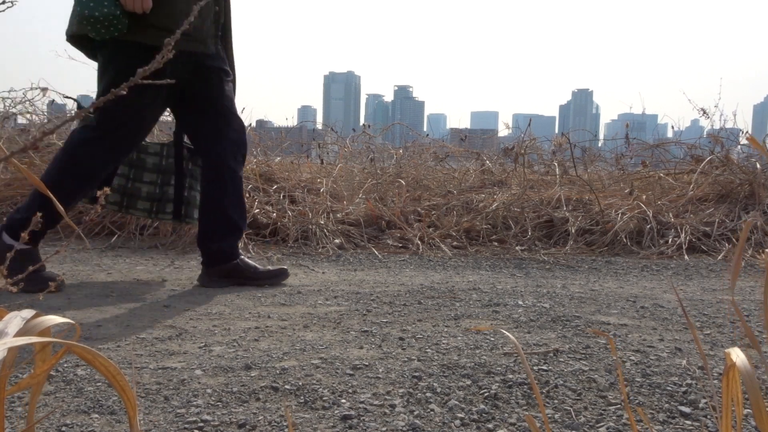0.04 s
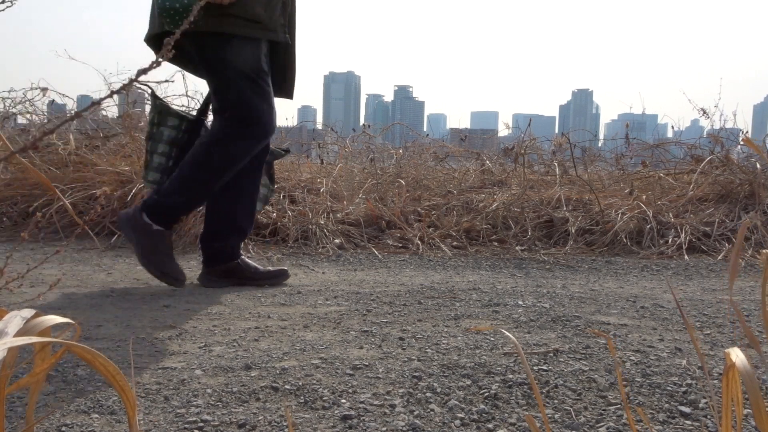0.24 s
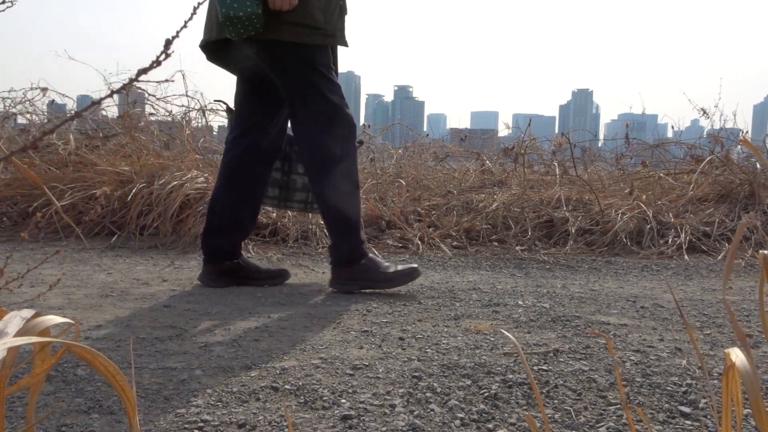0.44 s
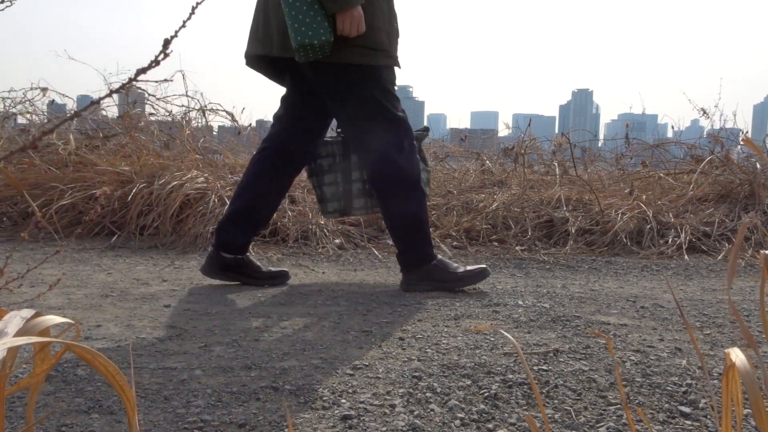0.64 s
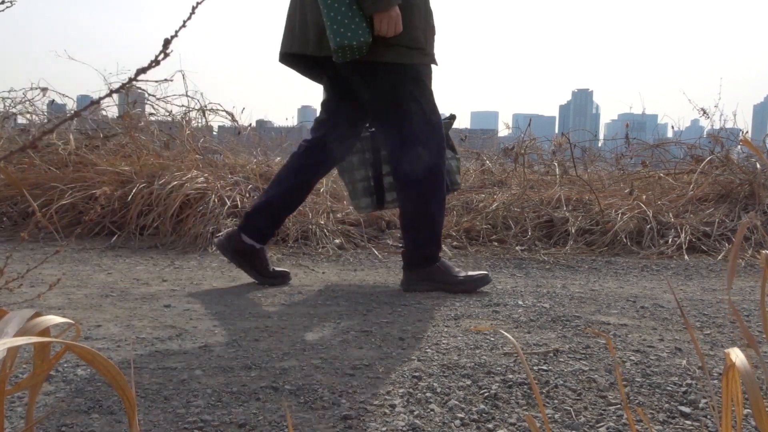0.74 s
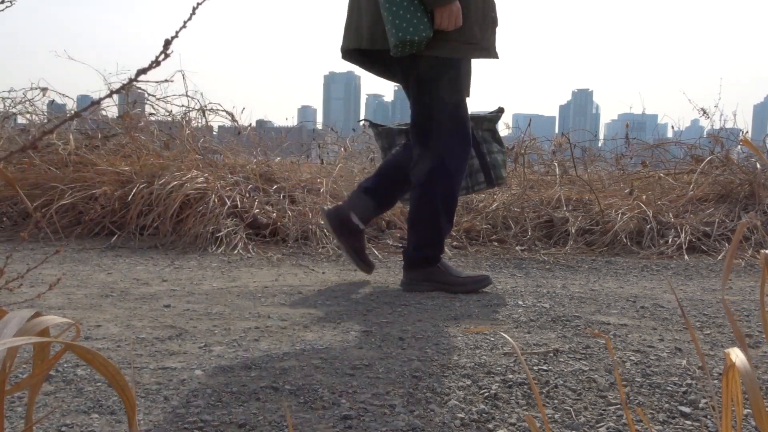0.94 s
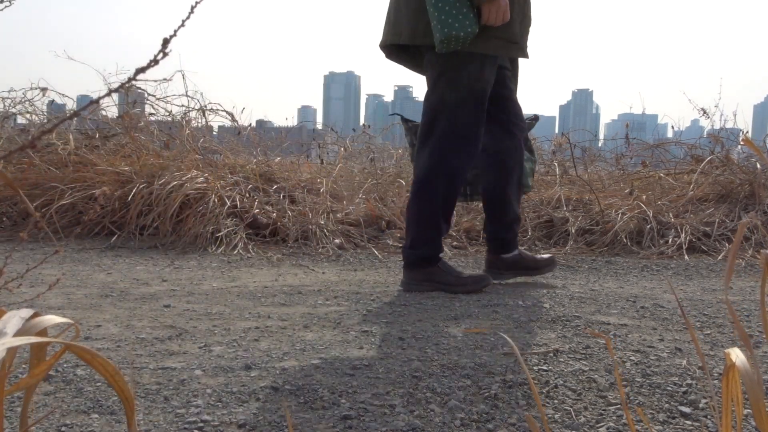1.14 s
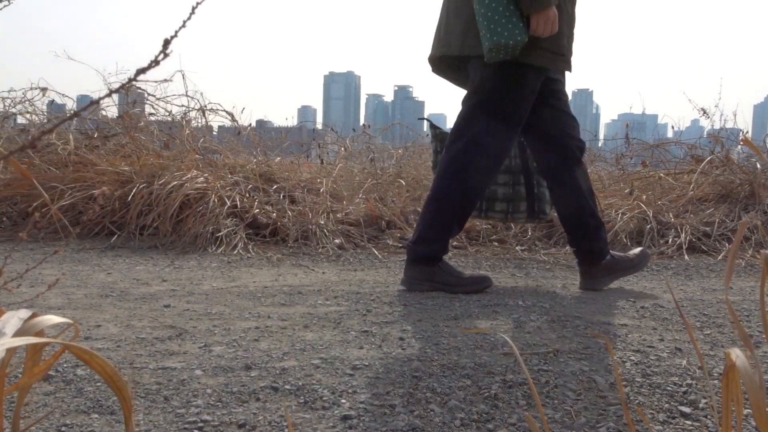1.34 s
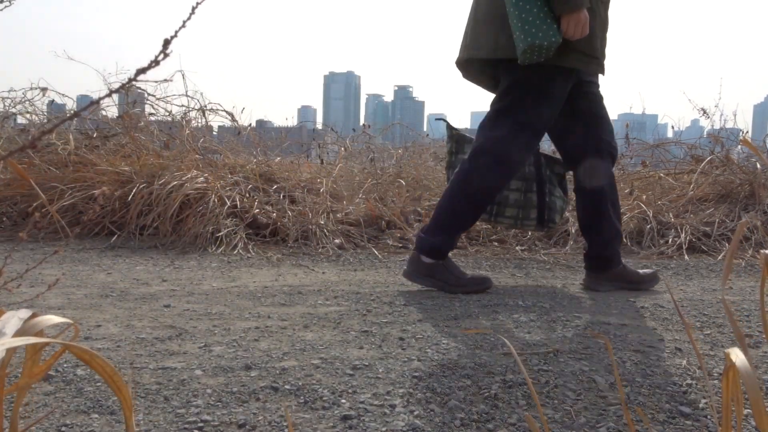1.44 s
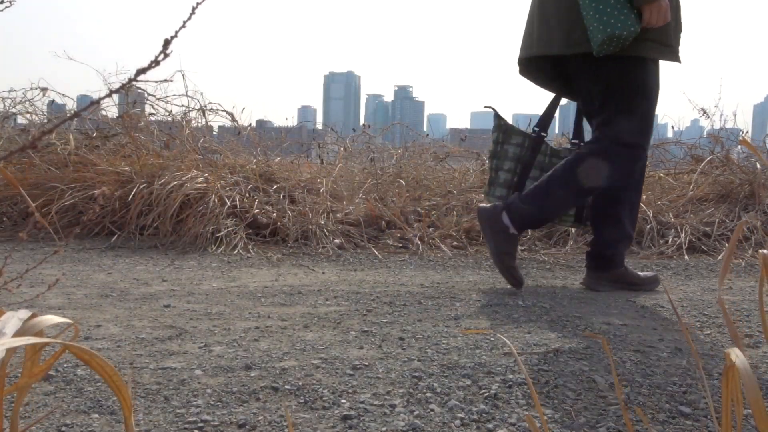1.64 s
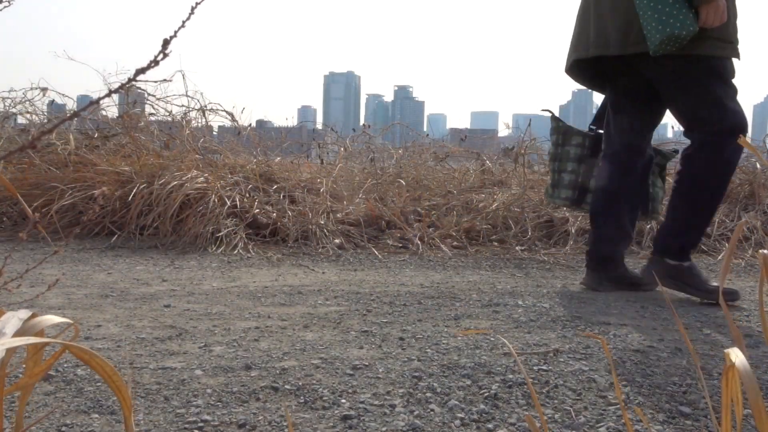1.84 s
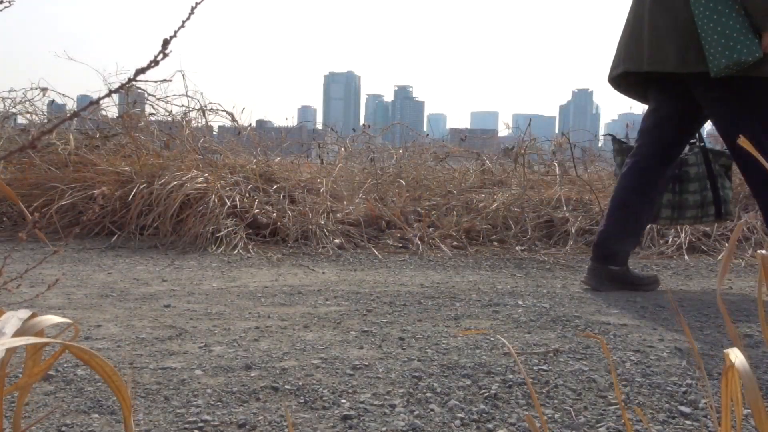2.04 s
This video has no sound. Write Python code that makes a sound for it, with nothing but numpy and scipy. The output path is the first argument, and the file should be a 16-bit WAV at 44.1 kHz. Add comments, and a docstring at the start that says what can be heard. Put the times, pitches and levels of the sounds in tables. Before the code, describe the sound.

Footsteps crunch on gravel, passing close by over a faint wash of distant traffic.

```python
"""Crunching footsteps pass close by on a gravel path, left to right, over the wash of a distant city.
Hard-soled shoes land on the heel, roll down and push off, pressing small grit into thousands of tiny
clicks that blend into a crunch. Single stones snap under the sole, and the swinging foot flicks pebbles
away. The path and the dry grass throw a little sound back. Far behind are steady traffic, a low hum
and a few faint, brief tones."""
import sys
import numpy as np
from scipy import signal
from scipy.fft import rfft, irfft
from scipy.io import wavfile
from scipy.ndimage import uniform_filter1d, map_coordinates

SR = 44100
rng = np.random.default_rng(int(sys.argv[2]) if len(sys.argv) > 2 else 0)


def master_out(mix):
    """Clip the mix to full scale and print it as 16-bit PCM to the path in sys.argv[1]."""
    frames = np.transpose(np.atleast_2d(mix))
    ceiling = np.clip(frames, -1, 1)
    pcm = np.round(ceiling * 32767).astype(np.int16)
    wavfile.write(sys.argv[1], SR, pcm)


N = 92213

# The tone of the distant traffic, from bass to treble: pitch_hz, relative_level_db
CITY_COLOUR = [(15, -57), (25, -50), (54, -23.5), (128, -9.5), (254, -10), (391, -5.5), (433, -5),
               (480, -4.5), (651, -5.5), (703, -4.5), (862, -10.5), (930, -9.5), (1550, -7), (3160, -15.5),
               (3410, -19), (5260, -21), (11000, -32), (14300, -85), (22000, -120)]
# How alike the traffic is on the left and right: pitch_hz, likeness_0_to_1
CITY_SIDES_ALIKE = [(60, 0.99), (140, 1), (340, 0.98), (810, 0.85), (1920, 0.48), (4570, 0.074),
                    (10900, 0.01)]
# Which side the traffic leans to: pitch_hz, left_minus_right_db
CITY_LEAN = [(100, -0.5), (500, 0), (2000, -3.5), (9000, 0)]
# Faint far-off tones: middle_s, half_length_s, pitch_hz, level_db
FAR_TONES = [(0.21, 0.081, 1560, -60), (0.22, 0.048, 1900, -56), (0.29, 0.037, 2160, -58.5),
             (0.274, 0.016, 975, -54.5), (.466, 0.018, 1340, -57.5)]
# The part of the thrown-back sound that differs between left and right: pitch_hz, gain_db
SCATTER_WIDTH = [(300, -40), (2000, -15), (5000, -5.5), (10000, 3)]
# Where the walker is heard: time_s, left_minus_right_db, left_delay_s
WALKER_PATH = [(0, 1, -.00003), (.7, -1, 0), (1.41, -4, .000015), (1.58, -2, .00001), (2.09, -7, .00004)]
# Loose pebbles flicked by the swinging foot: start_s, level_db
PEBBLE_FLICKS = [(0.496, -49.5), (0.5262, -50), (0.5589, -33), (1.8093, -41.5), (1.9777, -48)]
# The pitches a pebble rings with: pitch_hz, relative_level_db, fade_cycles
PEBBLE_RINGS = [(2600, -1, 0.27), (4870, -5, 1.04), (6020, -8, 0.52), (8300, -13.5, .22)]
# Hard contacts under the shoe: single stones snapping under the sole, plus the heel striking at 1.41 s (the
# loudest row): start_s, level_db, ring_pitch_hz, crack_against_ring_db
STONE_SNAPS = [ (0.0035, -26.5, 2010, -6.5), (0.0217, -35, 2140, -16), (0.0537, -34.5, 2200, -4),
               (0.159, -33, 2240, -14), (0.1659, -45, 2500, 5), (0.5766, -41.5, 2200, -18),
               (0.6563, -35, 2830, -1), (0.6739, -27, 2350, -4), (0.6759, -26.5, 1550, -10),
               (0.6860, -31, 1690, -20), (0.6890, -26.5, 2900, -7), (0.6915, -42, 2170, -14),
               (0.6964, -21.5, 2780, -15), (0.6966, -20.5, 1480, -12), (0.7003, -32, 1760, -14),
               (0.7265, -38.5, 2800, -19), (0.7396, -37, 2940, -1), (0.762, -34, 2800, -7),
               (0.7919, -37, 1450, -17), (0.8494, -39, 2480, -8), (0.8777, -28.5, 2350, -9),
               (1.3992, -33, 2480, -12), (1.41, -36, 2600, -4), (1.4143, -8.5, 1980, -19.5),
               (1.419, -38, 1930, -18), (1.4499, -27.5, 2500, -6), (1.4677, -32.5, 1500, -1.5),
               (1.4880, -32.5, 2500, -4), (1.5116, -36, 1160, -15), (1.5301, -21.5, 2210, -23),
               (1.5512, -27, 2270, -14), (1.5628, -24.5, 2500, -8), (1.5712, -28, 2280, -16),
               (1.5748, -22.5, 2180, -27), (1.5762, -29, 2250, -5), (1.5826, -28, 1280, -7),
               (1.5853, -31, 1890, -14), (1.6637, -30, 2250, -15), (1.6942, -40, 2000, -1), ]
# The tone shaping applied to all those snaps: pitch_hz, gain_db
STONE_TONE = [(150, -1), (420, 4), (950, -1), (2100, 0), (3100, -2), (4200, 0), (5600, -3), (7500, -3),
              (11000, -7)]
# Each press of a shoe on the grit (heel, sole, toe, push-off) over four steps:
# peak_s, rise_s, fall_s, level_db, grain_pitch_hz
SHOE_PRESSES = [ (0.004, 0.013, 0.14, -47.5, 2010), (0.159, 0.1, 0.084, -51, 1990),
                (0.661, 0.017, 0.014, -44.5, 1940), (0.693, 0.012, 0.014, -41.5, 1790),
                (0.762, 0.11, 0.097, -49.5, 1980), (1.302, 0.0044, 0.014, -53, 1780),
                (1.403, 0.021, 0.086, -46.5, 2200), (1.518, 0.072, 0.032, -46.5, 1730),
                (1.564, 0.016, 0.0066, -34.5, 2215), (1.576, 0.01, 0.0057, -33.5, 1990),
                (1.638, 0.086, 0.12, -49.5, 1926), (2.082, 0.006, .05, -46, 1580), ]
# The tone shaping applied to the whole crunch: pitch_hz, gain_db
GRIT_TONE = [(100, -16), (350, -1), (600, 2), (950, 1.5), (1250, -1), (2000, 0), (2700, 0), (3500, -3.5),
             (4400, -1), (5600, 1.5), (7000, -6.5), (11000, 17)]


def amp(db):
    """Turns decibels into a number to multiply by."""
    return 10 ** (np.asarray(db) / 20)


def unit(x):
    """Scales a signal to an average strength (rms) of 1."""
    return x / np.sqrt(np.mean(x ** 2) + 1e-20)


def look_up(table, hz):
    """Reads a table between its rows, on a musical (logarithmic) pitch scale."""
    pitches, values = np.transpose(table)
    return np.interp(np.log(hz + 1), np.log(pitches + 1), values)


def colour(x, table):
    """Makes each pitch louder or softer by a table of pitch_hz, gain_db."""
    size = 2 * N
    gain = amp(look_up(table, np.fft.rfftfreq(size, 1 / SR)))
    return irfft(rfft(x, size) * gain, size)[..., :N]


def add(mix, start_s, sound):
    """Mixes a sound in at the given time."""
    part = mix[max(round(start_s * SR), 0):][:len(sound)]
    part += sound[:len(part)]


def drift(samples):
    """A slow random wobble: noise averaged over this many samples."""
    return unit(uniform_filter1d(rng.standard_normal(N), size=samples))


def wavering_tone(hz, wander_hz):
    """A tone whose pitch wanders at random."""
    pitch_hz = hz + wander_hz * drift(500)
    return np.sqrt(2) * np.sin(2 * np.pi * np.cumsum(pitch_hz) / SR)


def ping(hz, fade_cycles):
    """One hard contact: a tiny ring that swells and dies, lasting longer with more fade_cycles."""
    cycles = hz * np.arange(500) / SR
    age = cycles / fade_cycles
    wave = np.gradient(age ** 4 * np.exp(-age) * np.sin(2 * np.pi * cycles))
    return wave / abs(wave).max()


def city_traffic(level_db=-55, patchy_db=1.56):
    """Distant traffic blends into a smooth wash of noise with slight drifting patches."""
    frames, hz = N // 256 + 5, np.fft.rfftfreq(1024, 1 / SR)
    a, b, c, d, patches = rng.standard_normal((frames, len(hz), 5)).T
    patches = uniform_filter1d(patches, size=10, axis=0)  # smooth across pitch
    patches = unit(uniform_filter1d(patches, size=16, axis=1))  # and across time
    alike = look_up(CITY_SIDES_ALIKE, hz)[:, None]
    left = a + 1j * b
    right = alike * left + np.sqrt(1 - alike ** 2) * (c + 1j * d)
    spectrum = np.array([left, right]) * amp(look_up(CITY_COLOUR, hz)[:, None] + patchy_db * patches)
    spectrum *= amp(np.array([[1], [-1]]) * look_up(CITY_LEAN, hz) / 2)[:, :, None]
    wash = signal.istft(spectrum, nperseg=1024, noverlap=768)[1][:, :N]
    return amp(level_db) * unit(wash)


def far_hum(level_db=-70, swell=0.4):
    """A low, far-off hum that comes and goes."""
    return amp(level_db) * wavering_tone(hz=383.8, wander_hz=13.22) * (1 + swell * drift(6000))


def far_tones(flutter=0.42):
    """A few faint tones from far away swell, flutter and fade."""
    t = np.arange(N) / SR
    out = np.zeros(N)
    for middle_s, half_s, hz, db in FAR_TONES:
        swell = np.exp(-.5 * ((t - middle_s) / half_s) ** 2) * (1 + flutter * drift(600))
        out += amp(db) * swell * wavering_tone(hz, wander_hz=43.5)
    return out


def ground_scatter(x, level_db=-15, die_away_s=0.05, delay_s=.0012, spread_s=.007):
    """The path and dry grass add a faint, short echo to a sound; gives left and right."""
    t = np.arange(6000) / SR
    tails = rng.standard_normal((2, len(t))) * amp(-60 * t / die_away_s) * (t > delay_s)
    tails[1] *= np.exp(-t / spread_s)  # the two sides differ only at the start of the echo
    shared, difference = (signal.oaconvolve(x, tail / np.linalg.norm(tail))[:N] for tail in tails)
    middle = x + amp(level_db) * shared
    side = colour(difference, SCATTER_WIDTH)
    return np.array([middle + side, middle - side])


def walk_past(pair):
    """Moves the steps from left to right: the nearer side hears them louder and a little sooner."""
    sides, t = np.array([[1], [-1]]), np.arange(N) / SR
    times_s, lean_db, left_delay_s = np.transpose(WALKER_PATH)
    positions = (t - sides * np.interp(t, times_s, left_delay_s) / 2) * SR
    delayed = np.array([map_coordinates(x, [at], order=3) for x, at in zip(pair, positions)])
    return delayed * amp(sides * np.interp(t, times_s, lean_db) / 2)


def flicked_pebbles():
    """Small pebbles click against each other with a high, stony ring."""
    out = np.zeros(N)
    click = sum(amp(db) * ping(hz, fade_cycles) for hz, db, fade_cycles in PEBBLE_RINGS)
    for start_s, db in PEBBLE_FLICKS:
        add(out, start_s, amp(db) * click)
    return out


def snapping_stones(knock_db=-22):
    """Each stone under the sole, and the hard heel striking, gives a short ring, a bright crack and a dull
    knock on the ground."""
    out = np.zeros(N)
    knock = amp(knock_db) * ping(hz=625, fade_cycles=.13)
    for start_s, db, ring_hz, crack_db in STONE_SNAPS:
        ring = ping(ring_hz, fade_cycles=.28)
        crack = amp(crack_db) * ping(hz=4300, fade_cycles=.24)
        add(out, start_s, amp(db) * (ring + knock + crack))
    return colour(out, STONE_TONE)


def grit_crunch(peak_s, rise_s, fall_s, db, hz, grains_per_s=6000, spread_db=3, spread_octaves=0.65):
    """Thousands of tiny contacts of many pitches swell and fade with the weight on the shoe."""
    kinds, soil_db, sand_db = 24, -16, -51
    t = np.arange(N) / SR - peak_s
    load = amp(db) * np.exp(np.minimum(t / rise_s, -t / fall_s))
    struck = rng.random(N) < grains_per_s / SR
    kind = rng.integers(0, kinds, N)
    strength = amp(spread_db * np.minimum(rng.exponential(1, N), 3.5))
    hits = struck * strength * rng.choice([-1, 1], N)
    # Each kind of grain has its own pitch: most lie near hz, a few far above or below.
    rank = (np.arange(kinds) + .5) / kinds
    octaves = spread_octaves * .5 * np.log(rank / (1 - rank))
    grains = [unit(ping(pitch, fade_cycles=.35)) for pitch in np.minimum(hz * 2 ** octaves, SR / 4)]
    grit = unit(sum(signal.oaconvolve(hits * (kind == k), grain)[:N] for k, grain in enumerate(grains)))
    # Packed soil answers each contact dully; fine sand hisses under even a light load.
    soil = unit(signal.oaconvolve(hits, ping(hz=583, fade_cycles=.29))[:N])
    sand = unit(signal.oaconvolve(hits, ping(hz=8000, fade_cycles=.3))[:N])
    return load * (grit + amp(soil_db) * soil) + amp(sand_db) * load ** 0.59 * sand


def scene():
    """The walker in front of the distant city."""
    crunch = colour(sum(grit_crunch(*press) for press in SHOE_PRESSES), GRIT_TONE)
    steps = ground_scatter(crunch + snapping_stones() + flicked_pebbles())
    return walk_past(steps) + city_traffic() + far_hum() + far_tones()


def record(dry):
    """Cuts away the highest treble."""
    low_pass = signal.firwin(401, cutoff=11200, window=("kaiser", 9), fs=SR)
    return signal.oaconvolve(dry, low_pass[None], "same")


dry = scene()
out = record(dry)
master_out(out)
```